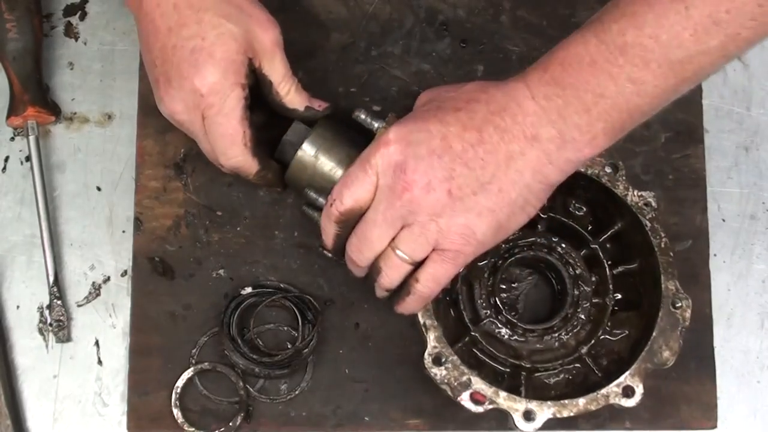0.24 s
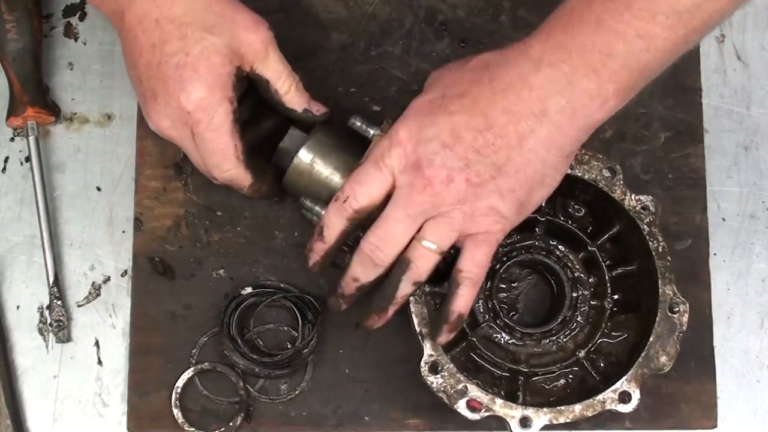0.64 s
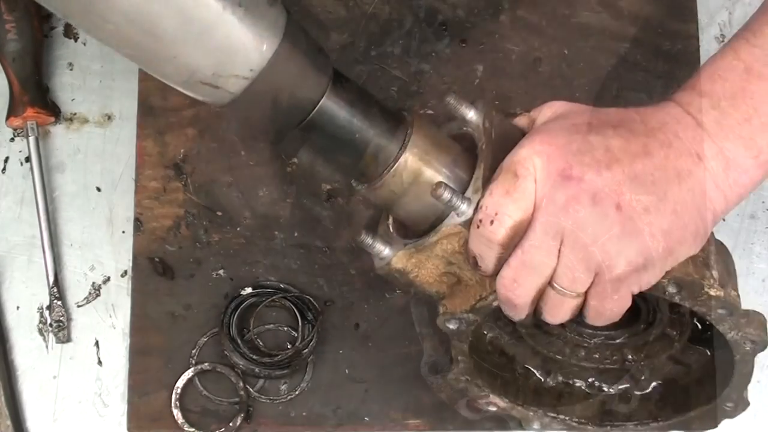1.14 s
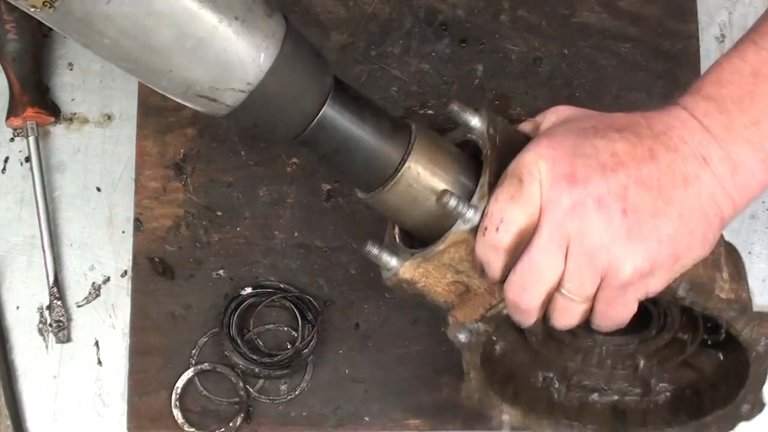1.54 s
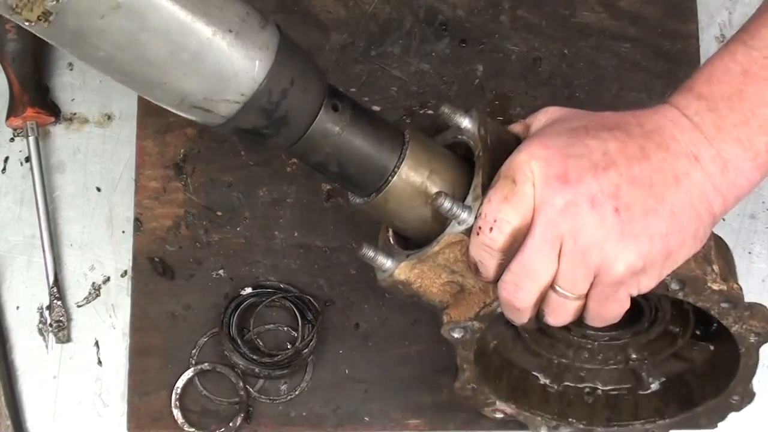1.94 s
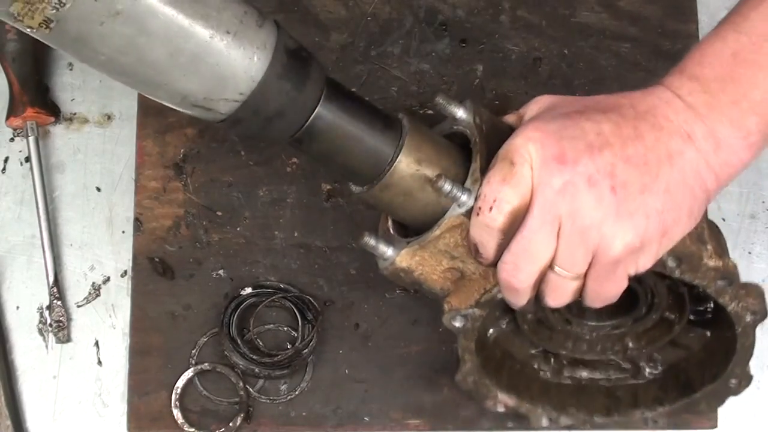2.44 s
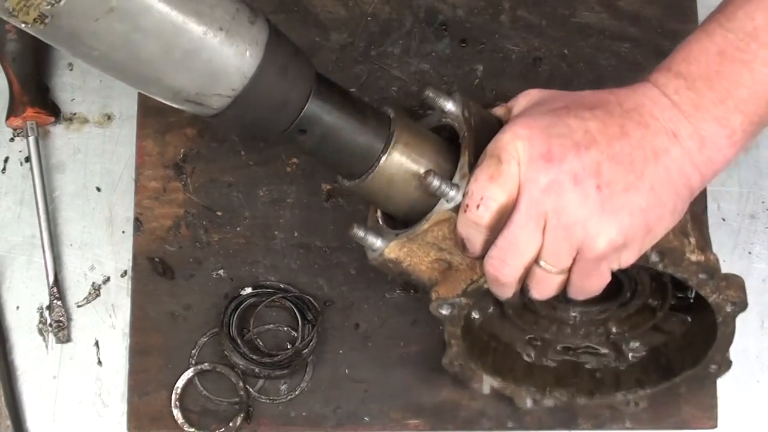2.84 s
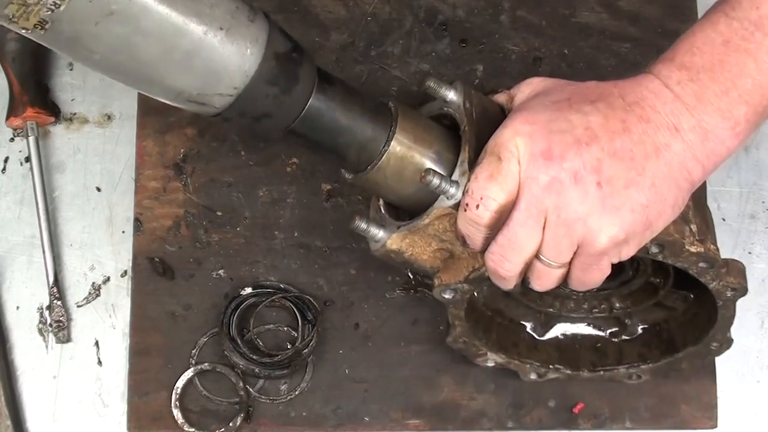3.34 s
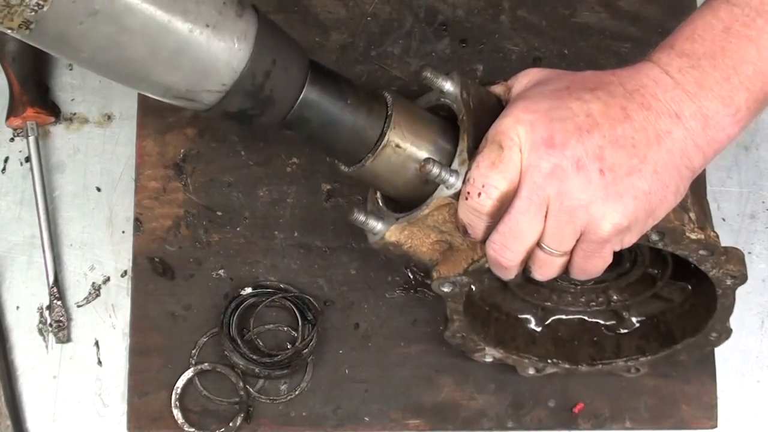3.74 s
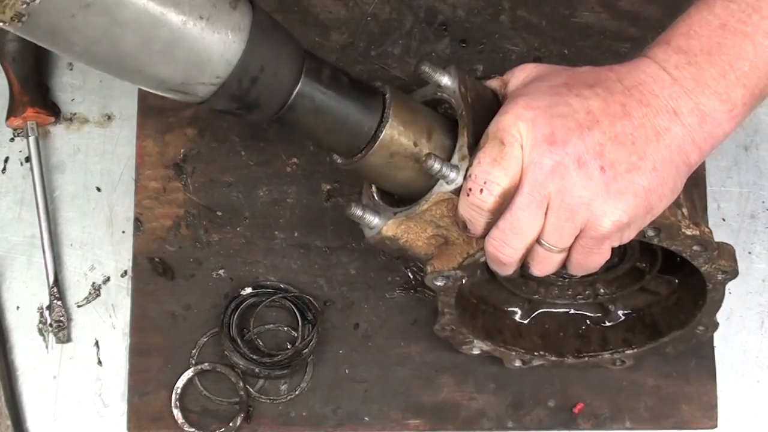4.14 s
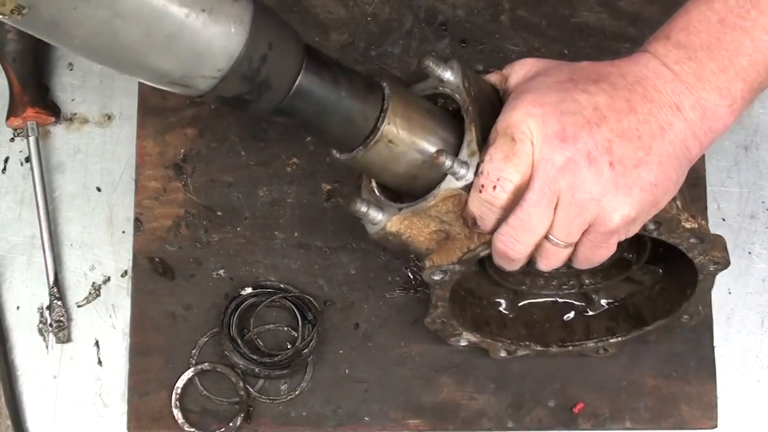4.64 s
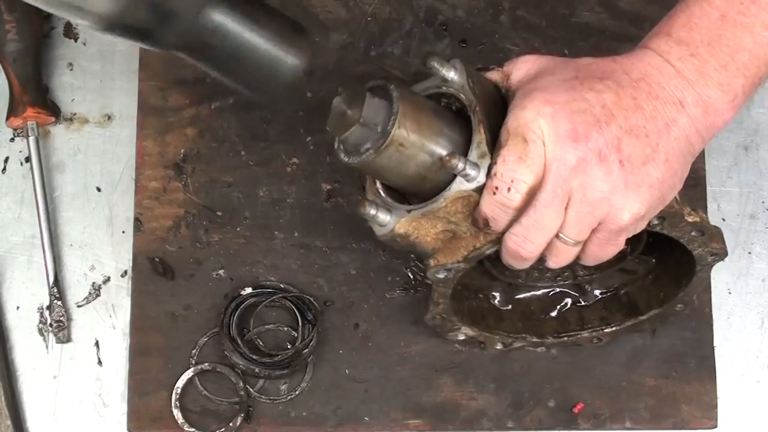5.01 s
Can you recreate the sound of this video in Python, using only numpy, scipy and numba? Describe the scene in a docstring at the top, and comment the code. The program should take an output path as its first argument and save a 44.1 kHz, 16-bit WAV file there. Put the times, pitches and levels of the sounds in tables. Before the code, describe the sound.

A metal housing bumps and knocks softly on a workbench over faint hiss. An air impact wrench fires briefly, its socket squealing, then hammers loudly for about two seconds with rapid ringing blows and hissing air. The blows turn brighter as the nut comes loose. Three short bursts follow, then a very faint clink. The sound is close, with light garage reverberation.

```python
"""Over a faint hiss, a gear housing bumps on a workbench, exciting the modes of both. At 1 s an air
impact wrench fires briefly and its socket squeals by stick-slip friction. A long run of blows follows:
each cracks, rings the socket and stalls the vane motor, which puffs air and winds up again. Near 3 s the
nut gives and the blows brighten; three short bursts and a last faint clink follow. Throughout, the
garage reverberates and a limiter ducks everything under the loud blows."""
import sys
import numpy as np
from scipy import signal
from scipy.fft import rfft, irfft
from scipy.io import wavfile
from scipy.ndimage import uniform_filter1d, minimum_filter1d
from numba import njit

SR = 44100
rng = np.random.default_rng(int(sys.argv[2]) if len(sys.argv) > 2 else 0)


def transcribe(signal):
    """Save signal, clipped to [-1, 1], as a 16-bit WAV file at the path in sys.argv[1]."""
    frames = np.atleast_2d(signal).T
    limited = np.clip(frames, -1, 1)
    pcm = np.round(limited * 32767).astype(np.int16)
    wavfile.write(sys.argv[1], SR, pcm)


N = 232520
T = np.arange(N) / SR


# contact spectra with the nut tight and loose: f/Hz, level/dB
TIGHT_CRACK = [(100, -26), (500, -13.5), (1000, -7), (2000, -8), (3200, 0), (5000, -1), (6900, 7),
               (9000, -7), (11500, -7.5), (14000, -29), (16000, -28)]
LOOSE_CRACK = [(100, -33.5), (500, -31), (1000, -12), (2000, -7), (5000, -6.5), (6800, 4), (9000, 0.5),
               (11500, 2), (14000, -13.5), (16000, -42.5)]

def hammer(blows, gain_db=8, contact_s=0.0045, rattle_db=-20, rattle_s=0.012, socket_db=-9):
    """Impact noise: each blow is a burst of tiny steel contacts, brighter once the nut is loose."""
    times, force_db, _ = blows.T
    loose = looseness()
    envelope = strikes(times, force_db, contact_s) + strikes(times, force_db + rattle_db, rattle_s)
    contact = noise() * envelope
    crack = (1 - loose) * colour(contact, TIGHT_CRACK) + loose * colour(contact, LOOSE_CRACK)
    return (crack + undb(socket_db) * socket(blows, loose)) * undb(gain_db)


# modes of socket, anvil and nut: f/Hz, t60/s, tight level/dB, loose level/dB
SOCKET_MODES = [(1203, 0.06, -10.5, -17.5), (1858, 0.07, -7, -19), (2897, 0.05, 2.5, -27),
                (3270, 0.066, -6.5, -11), (3476.6, 0.072, -12.5, -6), (3847, 0.061, -7.5, -7),
                (4520, 0.052, -2, -7), (5140, 0.02, -13.5, -13.5), (6770, .025, -2, -2.5),
                (6850, 0.0083, -14.5, -1), (7280, 0.006, 3, -5.5), (7500, 0.013, -8, -6.5),
                (8360, 0.018, -7, 6), (8770, .01, -17.5, -1.5), (11330, 0.042, -4, -1),
                (11250, 0.087, -9.5, -2)]

def socket(blows, loose, detune=0.006, uneven_db=2):
    """Free vibration: the socket seats anew at each blow, so its modes vary in pitch and strength."""
    hz, t60, tight_db, loose_db = np.transpose(SOCKET_MODES)
    t = T[:SR // 8, None]
    out = np.zeros(N)
    for start, force_db, ring_db in blows:
        i = int(start * SR)
        shift, strength, phase = rng.standard_normal((3, len(hz)))
        mode_db = tight_db + loose[i] * (loose_db - tight_db) + uneven_db * strength
        modes = np.sin(2 * np.pi * (hz * (1 + detune * shift) * t + phase)) * decay(t, t60)
        out[i:i + len(t)] += modes @ undb(force_db + ring_db + mode_db)
    return out


def looseness(free_s=3.0, freeing_s=0.13, before=0.25, after=0.95):
    """Static friction holds the nut, then yields: a smooth step on a scale of 0 (tight) to 1 (loose)."""
    return before + (after - before) * (1 + np.tanh((T - free_s) / freeing_s)) / 2


# trigger pulls: press t/s, first blow t/s, last blow and release t/s,
# coasting hiss cut-off t/s (no coasting if before release), air level/dB, force level/dB
TRIGGER_PULLS = [(0.96, 1.0251, 1.121, 1.24, -23.5, -10.5), (1.32, 1.3561, 1.9405, 2.09, -16, -4.5),
                 (2.092, 2.1174, 2.598, 2.76, -19, -6.5), (2.714, 2.7258, 3.206, 3.15, -18.5, -8.5),
                 (3.408, 3.4374, 3.539, 3.626, -20, -3.5), (3.804, 3.833, 3.935, 4.06, -19, -6.5),
                 (4.305, 4.335, 4.436, 4.54, -20.5, -9.5)]
# hard bites, early catches and the coasting rotor's knocks: t/s, force level/dB, ring level/dB
ACCENT_BLOWS = [(1.4074, -4, 5), (2.1034, -27, 1), (2.9927, 2, -1), (3.044, -4, -8), (3.0955, -5.5, 2),
                (3.1483, -7.5, 0), (3.2094, -5.5, 2), (3.483, -8.5, 5.5), (3.6258, -20, -4.5),
                (3.937, -6, -10.5), (4.0186, -10.5, -3.5), (4.3247, -22, -19), (4.585, -17.5, -6.5)]

def beat(period_s=0.0545, hurry_s=0.0135, settle_blows=1.5, first_db=-5.5, ring_db=-3):
    """A nearly periodic impulse train with accents, as rows of t/s, force level/dB, ring level/dB."""
    accent_s = np.transpose(ACCENT_BLOWS)[0]
    blows = list(ACCENT_BLOWS)
    for _, first, last, _, _, pull_db in TRIGGER_PULLS:
        k = np.arange(round((last - first + hurry_s) / period_s) + 1)
        lead = hurry_s * (1 - np.exp(-k / settle_blows))  # a full hose hurries the first blows
        times = np.linspace(first, last + lead[-1], len(k)) - lead
        force_scatter_db, ring_scatter_db = rng.normal(0, [1, 1.5], (len(k), 2)).T
        force_db = pull_db + first_db * (k == 0) + force_scatter_db
        rows = np.column_stack([times, force_db, ring_db + ring_scatter_db])
        # an accent replaces the blow it falls on
        blows += [row for row in rows if np.abs(accent_s - row[0]).min() > period_s / 8]
    return np.array(blows)


# spectra of the air jet and the muffled exhaust: f/Hz, level/dB
AIR_JET = [(200, -23.5), (900, -15.5), (1300, -6.5), (2500, -3.5), (4800, -2), (6900, 6), (8500, 1),
           (10500, -0.5), (12500, -14.5), (14500, -11), (16000, -16.5)]
EXHAUST = [(30, -24), (70, -14), (120, -5), (170, -1.5), (240, -4.5), (305, 0.5), (385, -7), (510, -5.5),
           (780, -8.5), (1000, -16), (2000, -9), (8000, -47.5)]

def motor(blows, stall_depth=0.46, windup_s=0.015, pause_s=0.022, pause_depth=0.74, hiss_db=3, low_db=-5):
    """Modulated flow: each blow stalls the rotor, so its hiss and exhaust note dip until it winds up."""
    stalls = np.sort(np.append(0, blows[:, 0]))
    since_stall = T - stalls[np.searchsorted(stalls, T, side="right") - 1]
    puffs, thumps = vanes(since_stall)
    speed = 1 - stall_depth * np.exp(-(since_stall / windup_s) ** 2)
    hiss = speed * colour(puffs, AIR_JET) * undb(hiss_db)
    # the low note drops at a blow and returns abruptly
    chug = 1 - pause_depth * np.exp(-(since_stall / pause_s) ** 4)
    exhaust = chug * colour(0.72 * thumps + 0.45 * noise(), EXHAUST) * undb(low_db)
    air, leak, coast = valve()
    return air_supply() * ((air + leak + coast * undb(-9)) * hiss + (air + coast) * exhaust)


def vanes(since_stall, stalled_hz=135, top_hz=265, climb_hz_per_s=2800, puff_depth=0.31, scatter_db=3.5):
    """The siren principle: each passing vane releases a puff of noise and a pressure pulse."""
    # constant torque raises the rate linearly
    nominal_rate = np.minimum(stalled_hz + climb_hz_per_s * since_stall, top_hz)
    # off load the vanes flap loosely: the note sags into a flutter
    wobble = np.interp(T, np.linspace(0, T[-1], 1000), rng.standard_normal(1000))
    ragged = np.interp(since_stall, [0.05, 0.075], [0.09, 0.5])
    passes = np.cumsum(nominal_rate * np.exp(ragged * (wobble - 0.5))) / SR
    vane = passes.astype(int)
    size = undb(scatter_db * noise()[vane])
    puffs = size * (1 + puff_depth * np.cos(2 * np.pi * passes)) * noise()
    thumps = size * np.diff(vane, prepend=0) * np.sqrt(SR / nominal_rate)
    return puffs, thumps


def valve(leak_db=-17, coast_db=-7, coast_s=0.17):
    """Flow envelopes: the valve leaks, then opens; inertia prolongs the flow from release to cut-off."""
    leak = sum(gate(on - 0.013, on, rise_s=0.019, fall_s=0.013) for on, *_ in TRIGGER_PULLS[1:])
    air = sum(gate(on, off, rise_s=0.026, fall_s=0.023) for on, _, off, *_ in TRIGGER_PULLS)
    coast = sum(gate(off, cut_off, rise_s=0.01, fall_s=0.006) * np.exp(-np.maximum(T - off, 0) / coast_s)
                for _, _, off, cut_off, *_ in TRIGGER_PULLS)
    return air, leak * undb(leak_db), coast * undb(coast_db)


def air_supply(fill_db=4.5, fill_s=0.082, sag_db_per_s=7.5):
    """Reservoir pressure as a gain: it builds behind the valve, then sags as the hose drains."""
    db = np.zeros(N)
    for pressed, _, released, _, air_db, _ in TRIGGER_PULLS:
        held = np.clip(T - pressed, 0, released - pressed)
        pull_db = air_db - fill_db * np.exp(-held / fill_s) - sag_db_per_s * held
        db = np.where(T > pressed - 0.015, pull_db, db)
    return undb(db)


# slips of the dry socket: start t/s, duration/s, squeal level/dB, rasp level/dB
SOCKET_SLIPS = [(1.017, 0.1, -30.5, -33), (1.122, .185, -25, -18.5), (1.311, .12, -40, -21.5),
                (2.088, .027, -47.5, -26)]
# friction-driven modes: f/Hz, t60/s, level/dB
SQUEAL_PAIR = [(1866, .07, 0), (1933, .07, 0)]
RASP_MODES = [(1450, 0.0017, -5.5), (2920, 0.0033, -1), (3545, 0.005, -6), (4500, 0.015, -5),
              (5660, 0.0015, -0.5), (7600, 0.0019, 1)]

def squeal(grab_s=0.0073, let_go_s=0.007, chatter_db=3, chatter_per_s=90):
    """Stick-slip friction of steel on steel: a close pair of modes chatters over a broader rasp."""
    starts, lengths, squeal_db, rasp_db = np.transpose(SOCKET_SLIPS)
    slipping = np.array([gate(on, off, grab_s, let_go_s) for on, off in zip(starts, starts + lengths)])
    chatter = undb(chatter_db * np.interp(T * chatter_per_s, np.arange(N), noise()))
    tone = chatter * ring(noise(), SQUEAL_PAIR) * (undb(squeal_db) @ slipping)
    rasp = ring(noise(), RASP_MODES) * (undb(rasp_db) @ slipping)
    return tone + rasp


# housing shifted, socket put on and off: t/s, then level/dB of thud, knock, clink and tick
BUMPS = [(0.012, -36, -18.5, -27.5, -51), (.201, -24.5, -26.5, -29, -31.5), (0.256, -33.5, -38, -35.5, -40),
         (0.323, -42.5, -51.5, -38.5, -45), (0.336, -37, -56.5, -54, -37.5),
         (.378, -29.5, -27.5, -37.5, -42), (0.461, -47, -61, -40, -51), (0.969, -53, -43.5, -24.5, -17),
         (5.001, -69, -73, -49, -57)]
# modes of the bench top and the cast housing: f/Hz, t60/s, level/dB
BENCH_MODES = [(72.5, 0.18, 1), (134, 0.063, 2.5), (209.7, 0.17, -1.5)]
HOUSING_MODES = [(151.4, 0.12, -2.5), (289, 0.099, -2), (334, 0.17, -4), (493, 0.018, -0.5),
                 (690, 0.017, 0), (907, 0.025, -5.5)]
# spectra of metal and gritty contacts: f/Hz, level/dB
METAL_CLINK = [(300, -20), (900, -9), (1300, -0.5), (1650, -4.5), (1950, -5.5), (2300, -6), (4000, -22.5),
               (12000, -36)]
GRIT_TICK = [(1000, -27.5), (3000, -5.5), (5500, -2.5), (7200, 1), (7900, 0), (8800, -3), (11000, -18),
             (16000, -23.5)]

def handling(rebound_s=0.0194, rebound_db=-1):
    """Impulse excitation: the housing bumps and rocks back; the bench thuds and the casting knocks."""
    times, thud_db, knock_db, clink_db, tick_db = np.transpose(BUMPS)
    landings = np.append(times, times + rebound_s)
    landing_db = np.append(thud_db, thud_db + rebound_db)
    thud = ring(strikes(landings, landing_db - 12, decay_s=0.0014), BENCH_MODES)
    knock = ring(strikes(times, knock_db + 8, decay_s=0.00017), HOUSING_MODES)
    clink = colour(noise() * strikes(times, clink_db, decay_s=0.011), METAL_CLINK)
    tick = colour(noise() * strikes(times, tick_db, decay_s=0.0035), GRIT_TICK)
    friction = noise() * strikes(landings, landing_db - 10.5, decay_s=0.033)
    scrape = ring(friction, BENCH_MODES + HOUSING_MODES)
    return thud + knock + clink + tick + scrape


# left-right difference of the bench reflections: f/Hz, level/dB
REFLECTION_WIDTH = [(100, 1), (250, 1), (550, 6), (1100, 5), (2000, -5), (4500, 2.5), (8000, 3.5),
                    (16000, -4.5)]

def bench_reflections(x, decay_s=0.002):
    """Early reflections: dense, short echoes off the bench differ between left and right."""
    t = T[:SR // 50]
    echoes = rng.standard_normal(len(t)) * t * np.exp(-t / decay_s)
    return colour(convolve(x, echoes), REFLECTION_WIDTH)


# reverberation time of the garage: f/Hz, t60/s
GARAGE_T60 = [(100, 0.38), (300, 1.15), (800, 1.05), (2000, 1.16), (4500, 0.95), (7500, 0.6), (11000, 0.41),
              (16000, 0.4)]

def garage(x, onset_s=0.0015):
    """A diffuse field: each band decays exponentially, treble and deep bass sooner than the middle."""
    t = T[:int(1.2 * SR)]
    spectrum = rfft(rng.standard_normal(len(t)))
    hz = np.arange(len(spectrum)) * SR / len(t)
    edges = np.append(0, np.geomspace(100, SR / 2, 20))
    tail = np.zeros(len(t))
    for low, high in zip(edges, edges[1:]):
        band = irfft(spectrum * (hz >= low) * (hz < high), len(t))
        tail += band * decay(t, at((low + high) / 2, GARAGE_T60))
    return convolve(x, tail * (1 - np.exp(-t / onset_s)))


# spectra of the opening hiss and the steady noise floor: f/Hz, level/dB
OPENING_HISS = [(18, -40), (30, -27), (103, -1.5), (204, -11), (233, 6), (273, -13), (404, -7), (499, -14),
                (801, -13), (3060, -23.5), (3870, -33), (4780, -21.5), (16000, -26)]
NOISE_FLOOR = [(18, -45), (30, -3), (118, 1.5), (179, -6.5), (303, 4.5), (889, -8.5), (1010, -8.5),
               (6380, -16), (16000, -20)]

def background(whistle_hz=3973, hum_hz=120):
    """Ambient noise: hiss and a resonant whistle fade out between 0.75 and 1.25 s; mains hum and floor stay."""
    fade = np.interp(T, [0.75, 1.25], [0.92, 0])
    hiss = colour(noise(), OPENING_HISS) * undb(-50)
    whistle = ring(noise(), [(whistle_hz, 0.015, 0)]) * undb(-57.5)
    hum = np.sin(2 * np.pi * hum_hz * T) * undb(-70)
    return fade * (hiss + whistle) + hum + colour(noise(), NOISE_FLOOR) * undb(-69)


def undb(db):
    """Level to amplitude ratio."""
    return 10 ** (np.asarray(db) / 20)


def noise():
    """Gaussian white noise of rms 1."""
    return rng.standard_normal(N)


def decay(t, t60):
    """Exponential damping: 60 dB down after t60."""
    return np.exp(-np.log(1000) * t / t60)


def at(hz, points):
    """Interpolation of (f/Hz, value) rows on a log-frequency axis."""
    f, value = np.transpose(points)
    return np.interp(np.log(np.maximum(hz, 1)), np.log(f), value)


def convolve(x, response):
    """Convolution with a response scaled to unit energy, so white noise keeps its level."""
    return signal.fftconvolve(x, response / np.linalg.norm(response))[:N]


def colour(x, points, size=4096):
    """Minimum-phase filtering: folding the cepstrum gives a causal response of this spectral shape."""
    gain = undb(at(np.arange(size // 2 + 1) * SR / size, points))
    cepstrum = irfft(np.log(gain))
    cepstrum[1:size // 2] *= 2
    cepstrum[size // 2 + 1:] = 0
    return convolve(x, irfft(np.exp(rfft(cepstrum))))


def ring(x, modes):
    """Modal superposition: x drives damped sinusoids of alternating sign."""
    t = T[:SR // 2]
    response = sum((-1) ** k * undb(db) / np.sqrt(t60) * np.sin(2 * np.pi * hz * t) * decay(t, t60)
                   for k, (hz, t60, db) in enumerate(modes))
    return convolve(x, response)


def strikes(times, db, decay_s):
    """Leaky integration of impulses: an envelope that jumps at each time and dies away."""
    kicks = np.zeros(N)
    np.add.at(kicks, (np.asarray(times) * SR).astype(int), undb(db))
    return signal.lfilter([1], [1, -np.exp(-1 / (decay_s * SR))], kicks)


def gate(start, stop, rise_s, fall_s):
    """A linear rise from start and an exponential fall after stop."""
    return np.clip((T - start) / rise_s, 0, 1) * np.exp(-np.maximum(T - stop, 0) / fall_s)


@njit
def follow_peaks(peaks, keep):
    """Peak detection: instant attack, exponential release."""
    out, held = np.empty(len(peaks)), 0.
    for i in range(len(peaks)):
        held = max(peaks[i], held * keep)
        out[i] = held
    return out


def scene(room_db=-12, room_side_db=-25, bench_side_db=-21, bass_left=0.14):
    """Mid-side stereo: the close sources sit near the centre and reflections add a little width."""
    blows = beat()
    close = motor(blows) + hammer(blows) + squeal() + handling()
    mid = close + undb(room_db) * garage(close) + background()
    side = undb(bench_side_db) * bench_reflections(mid) + undb(room_side_db) * garage(close)
    bass = signal.sosfilt(signal.butter(2, 750, fs=SR, output="sos"), mid)
    side += 0.022 * mid + bass_left * bass  # a lean to the left, mostly in the low notes
    return np.array([mid + side, mid - side])


def record(dry, threshold=0.4, slope=0.74, release_s=0.016, ahead_s=0.0023, detector_hz=6500):
    """Look-ahead limiting ducks the gain just before each peak; soft clipping and band limits follow."""
    # the detector is less sensitive to treble, so bright blows come through louder
    sensed = signal.sosfilt(signal.butter(2, detector_hz, fs=SR, output="sos"), dry)
    excess = np.maximum(np.abs(sensed).max(axis=0) / threshold, 1)
    coming_peak = -minimum_filter1d(-excess, 2 * int(ahead_s * SR) + 1)
    gain = follow_peaks(coming_peak, np.exp(-1 / (release_s * SR))) ** -slope
    limited = np.tanh(dry * uniform_filter1d(gain, size=24))
    low_cut = signal.sosfilt(signal.butter(2, 35, "high", fs=SR, output="sos"), limited)
    return signal.sosfilt(signal.ellip(10, 0.2, 80, 16000, fs=SR, output="sos"), low_cut)


dry = scene()
out = record(dry)
transcribe(out)
```